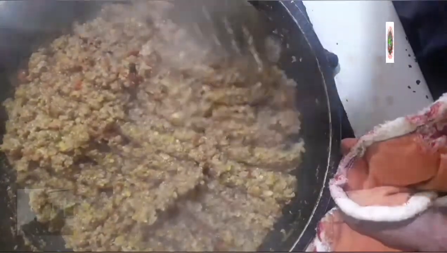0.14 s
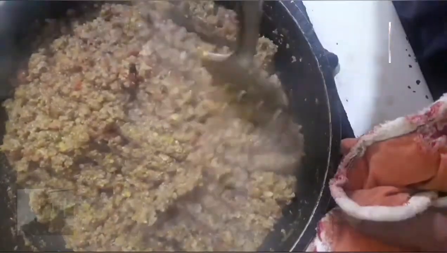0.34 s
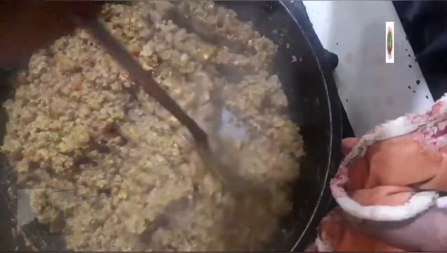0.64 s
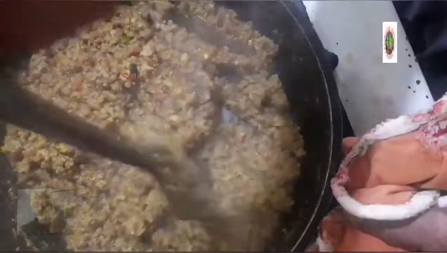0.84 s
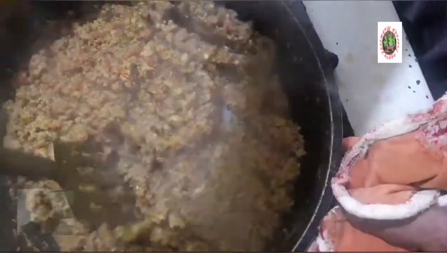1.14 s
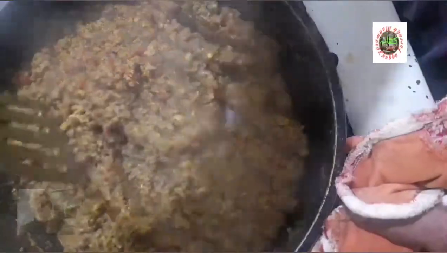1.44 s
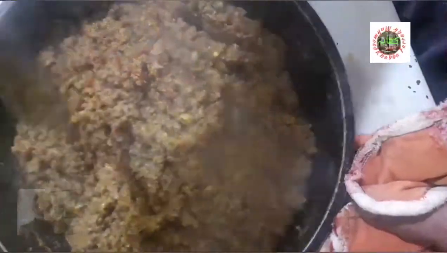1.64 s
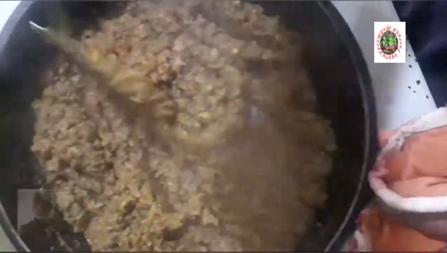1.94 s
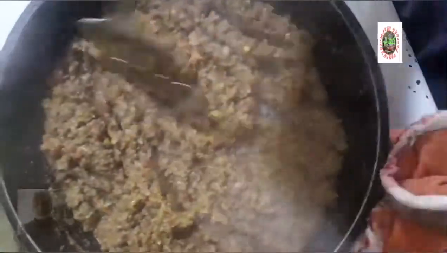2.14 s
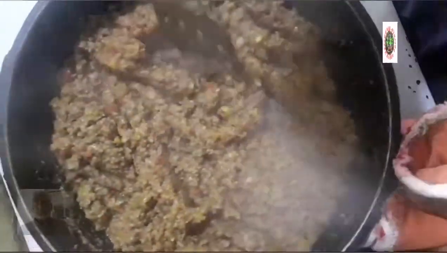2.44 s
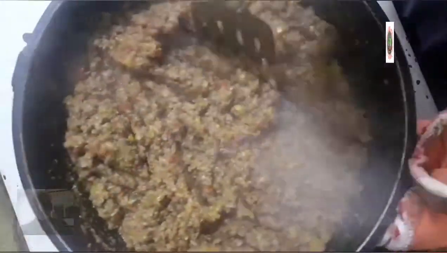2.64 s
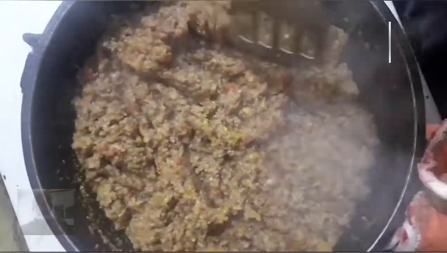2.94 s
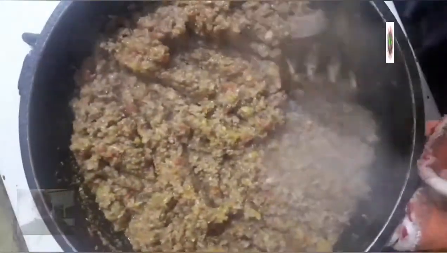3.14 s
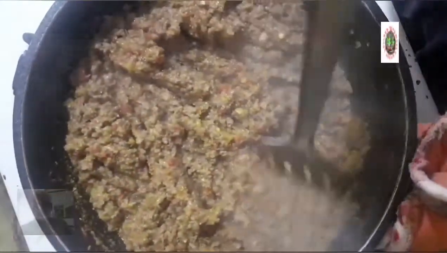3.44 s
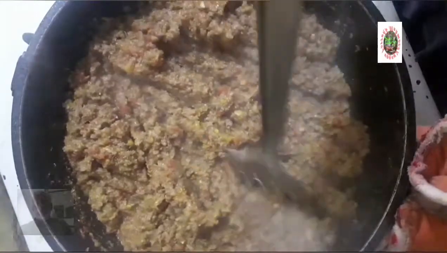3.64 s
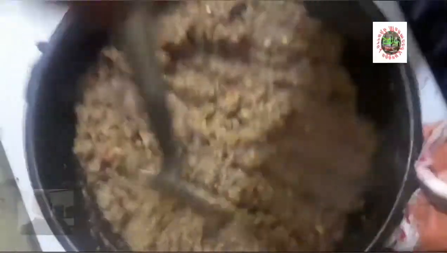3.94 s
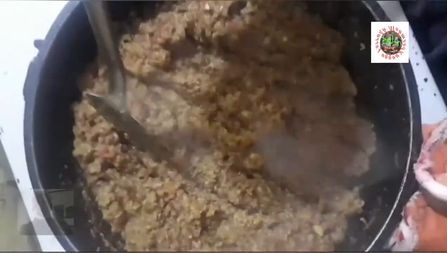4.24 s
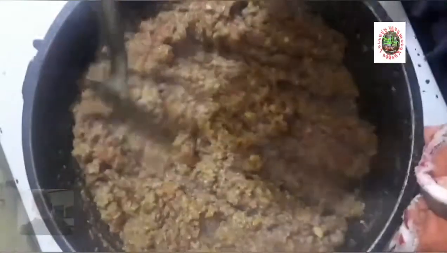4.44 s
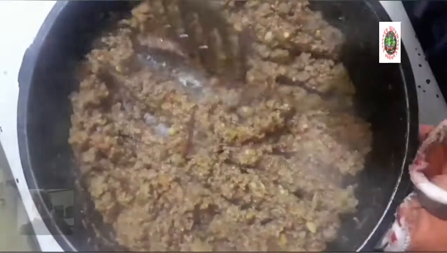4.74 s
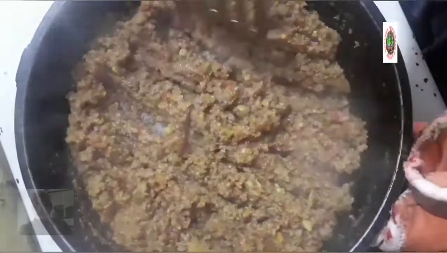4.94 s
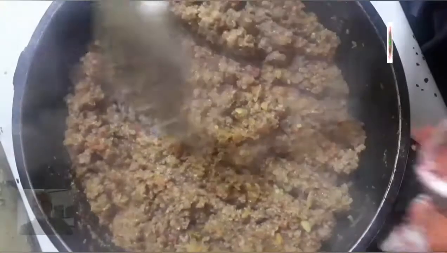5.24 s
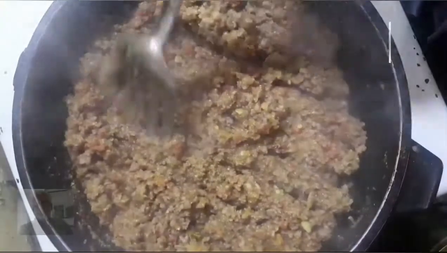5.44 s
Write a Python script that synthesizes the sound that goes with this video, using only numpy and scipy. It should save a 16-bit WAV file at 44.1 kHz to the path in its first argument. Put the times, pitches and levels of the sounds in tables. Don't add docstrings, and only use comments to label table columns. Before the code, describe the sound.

Steady frying hiss and a low flame rumble run beneath quick, uneven metal chops against a pan. Hard clacks dominate the first two seconds, duller cushioned touches break in between later groups of loud blows, and the strongest, thudding hit comes shortly before the end. Thin blade rings, small scrapes and wet meat pats fill the gaps. Close single microphone, hard small kitchen, brief reflections.

```python
import sys
import numpy as np
from scipy import signal
from scipy.fft import rfft, irfft, next_fast_len
from scipy.io import wavfile
from scipy.ndimage import uniform_filter1d, minimum_filter1d

SR = 44100
rng = np.random.default_rng(int(sys.argv[2]) if len(sys.argv) > 2 else 0)


def transcribe(signal):
    frames = np.atleast_2d(signal).T
    limited = np.clip(frames, -1, 1)
    pcm = np.round(limited * 32767).astype(np.int16)
    wavfile.write(sys.argv[1], SR, pcm)


def how_loud(loudness_db):
    steps = np.asarray(loudness_db, float) / 20
    return 10 ** steps


N = 247401


def rms_one(x):
    return x / np.sqrt(np.mean(x ** 2) + 1e-20)


def at_hz(points, hz):
    table_hz, values = np.array(points)[:, 0], np.array(points)[:, 1]
    return np.interp(np.log(np.maximum(hz, 1)), np.log(table_hz), values)


def colour(x, spectrum):
    size = next_fast_len(len(x))
    hz = np.arange(size // 2 + 1) * SR / size
    return irfft(rfft(x, size) * how_loud(at_hz(spectrum, hz)), size)[:len(x)]


def band(x, low_hz, high_hz):
    return signal.sosfilt(signal.butter(2, [low_hz, high_hz], "band", fs=SR, output="sos"), x)


def drift(rate_hz):
    r = np.exp(-80 * np.pi * rate_hz / SR)
    slow = signal.lfilter([1], [1, -2 * r, r * r], rng.standard_normal(N // 40 + 2002))[2000:]
    return np.interp(np.arange(N) / 40, np.arange(len(slow)), rms_one(slow))


def ring(push, hz, t60):
    r, w = how_loud(-60 / (t60 * SR)), 2 * np.pi * hz / SR
    return signal.lfilter([0, np.sin(w)], [1, -2 * r * np.cos(w), r * r], push + 1e-18)


def lift(hz, mode_hz, width_hz):
    return 1 / (1 + (2 * (hz - mode_hz) / width_hz) ** 2)


def struck(db_by_bin):
    size = 2 * (len(db_by_bin) - 1)
    cepstrum = irfft(db_by_bin * np.log(10) / 20, size)
    cepstrum[1:size // 2] *= 2
    cepstrum[size // 2 + 1:] = 0
    return irfft(np.exp(rfft(cepstrum)), size)


def scatter(x, spread_s, count=3):
    for lag in (rng.uniform(.2, 1, count) * spread_s * SR).astype(int) + 2:
        poles = np.zeros(lag + 1)
        poles[[0, -1]] = 1, -0.72
        x = signal.lfilter(poles[::-1], poles, x)
    return x


def add(track, s, sound):
    i = max(round(s * SR), 0)
    track[i:i + len(sound)] += sound[:N - i]


# time in seconds, level in dB.
FRY_VIGOUR = [
    (0.0, -51),
    (0.7, -51),
    (1.48, -51),
    (1.83, -52),
    (2.25, -51),
    (3.2, -53),
    (4.2, -53),
    (4.7, -52),
    (5.3, -53),
    (5.61, -53),
]
# frequency in Hz, density in dB per Hz.
SIZZLE_COLOUR = [(760, -39), (1300, -31), (1670, 1.5), (2900, -3.5), (3840, 0.5), (5650, -1), (7040, -1),
                 (7490, -2.5), (9130, -14.5), (10800, -8), (15700, -8.5)]
# frequency in Hz, density in dB per Hz.
BURNER_COLOUR = [(18, -71), (30, -21), (75, -14.5), (87, -8), (188, -13), (240, -3.5), (269, -10),
                 (386, -4), (432, -10), (673, -15.5), (1500, -19), (1950, -47), (3300, -120)]


def frying(pops_per_s=9200.0, uneven_db=2.5, flicker_db=.4):
    s, sizzle_db = np.transpose(FRY_VIGOUR)
    burner_db = -49 + 1.74 * (sizzle_db - sizzle_db.mean())
    t = np.arange(N) / SR
    pops = how_loud(uneven_db * np.minimum(rng.exponential(1, N), 5)) * rng.choice([-1, 1], N)
    pops *= rng.random(N) < pops_per_s / SR
    sizzle = rms_one(colour(pops, SIZZLE_COLOUR))
    sizzle *= how_loud(np.interp(t, s, sizzle_db) + 2.0 + flicker_db * drift(9.1))
    burner = rms_one(colour(rng.standard_normal(N), BURNER_COLOUR))
    burner *= how_loud(np.interp(t, s, burner_db) + 1.5 * drift(8))
    return sizzle + burner


# frequency in Hz, time to fall 60 dB in seconds.
ROOM_T60 = [(200, 0.29), (530, 0.31), (1390, 0.32), (3680, 0.28), (9700, 0.22)]
# frequency in Hz, level in dB.
ROOM_COLOUR = [(100, 9), (350, 13.5), (1000, 2.5), (2000, 3), (3500, 1), (7500, 3), (9000, 2.5),
               (15000, 2.5)]


def kitchen(x, gap_s=0.0018, swell_s=0.0036, moves_per_s=1.699, count=3):
    wall_s, wall_spread_s, wall_db = 0.017, 0.0048, 2.5
    t = np.arange(round(.6 * SR)) / SR
    edges, out = 90 * 2 ** np.arange(0, 7.9, .5), 0
    for k in range(count):
        reply = 0
        for low, high in zip(edges, edges[1:]):
            hz = np.sqrt(low * high)
            decay_db = at_hz(ROOM_COLOUR, hz) - 60 * t / (1.07 * at_hz(ROOM_T60, hz))
            reply = reply + band(rng.standard_normal(len(t)), low, high) * how_loud(decay_db)
        reply *= np.clip((t - gap_s) / swell_s, 0, 1)
        reply *= how_loud(wall_db * np.exp(-((t - wall_s) / wall_spread_s) ** 2))
        share = np.sqrt(2 / count) * np.cos(np.pi * (moves_per_s * np.arange(N) / SR + k / count))
        out = out + signal.fftconvolve(x * share, reply / np.sqrt(np.sum(reply ** 2)))[:N]
    return out


# start in seconds, length in seconds, centre in Hz, level in dB.
MEAT_SLAPS = [
    (1.175, 0.015, 630, -36),
    (1.365, 0.01, 574, -35),
    (1.529, 0.023, 400, -28),
    (2.03, 0.0095, 400, -49),
    (3.98, 0.048, 372, -47),
    (4.631, 0.039, 474, -52),
    (5.026, 0.051, 322, -51),
]


def slaps(lumps_per_s=400.0):
    out, t = np.zeros(N), np.arange(8000) / SR
    for s, length, hz, db in MEAT_SLAPS:
        lumps = rng.standard_normal(len(t)) * (rng.random(len(t)) < lumps_per_s / SR)
        shape = np.sin(np.pi * np.clip(t / length, 0, 1))
        add(out, s, how_loud(db) * rms_one(band(lumps, hz * 0.7, hz * 1.48)) * shape)
    return out


# start in seconds, peak in dB.
HOB_BLOWS = [
    (2.042, -13),
    (3.403, -34),
    (3.773, -25),
    (4.423, -50),
    (4.814, -12),
]


def thuds(hob_hz=110, die_s=0.0015):
    out, t = np.zeros(N), np.arange(4000) / SR
    for s, db in HOB_BLOWS:
        push = np.sin(2 * np.pi * hob_hz * t) * np.exp(-t / die_s)
        add(out, s + 0.00024, -how_loud(db + 11.5) * push)
    return out


# start in seconds, pitch in Hz, level in dB.
BLADE_SINGS = [(0.587, 5050, -53), (0.585, 1420, -37), (1.137, 1780, -44), (1.848, 4520, -37),
               (2.04, 3930, -45), (2.226, 5020, -40), (2.224, 7100, -28), (2.625, 5050, -31),
               (3.402, 3360, -22), (3.57, 3330, -32), (3.775, 3400, -31), (3.775, 960, -49),
               (3.956, 3370, -31), (4.42, 4580, -23.5), (4.816, 7800, -41), (5.405, 5040, -39),
               (5.405, 3320, -50)]
SLOT_SPLITS = [-.019, -.007, 0, .011, .023]
# start in seconds, pitch in Hz, level in dB, 60 dB decay in seconds.
CLEAN_TONES = [
    (5.405, 2805, -40, .5),
    (5.405, 4900, -44, .4),
    (5.405, 1443, -48, .4),
    (4.421, 4544, -38, .35),
    (1.668, 4522, -44, .25),
    (1.668, 7208, -44, .22),
    (1.668, 10280, -44, .19),
]


def blade(uneven_db=4.0, sing_t60_s=.3):
    out, tap = np.zeros(N), np.eye(1, 20000)[0]
    lucks = rng.normal(0, 1, (len(BLADE_SINGS), len(SLOT_SPLITS)))
    for (s, hz, db), luck in zip(BLADE_SINGS, lucks):
        for split, share in zip(SLOT_SPLITS, luck):
            tone = ring(tap, hz * (1 + 1.5 * split), sing_t60_s * (.8 - 12 * abs(split)))
            add(out, s, how_loud(db - 4 + uneven_db * share) * tone)
    for s, hz, db, t60 in CLEAN_TONES:
        add(out, s, how_loud(db) * ring(tap, hz, t60))
    return out


# start in seconds, length in seconds, pitch in Hz, level in dB.
BLADE_SQUEALS = [
    (0.2252, 0.017, 4560, -17),
    (1.663, 0.014, 4520, -22),
]


def squeals(t60_s=.06):
    out = np.zeros(N)
    for s, length, hz, db in BLADE_SQUEALS:
        stroke = np.sin(np.pi * np.clip(np.arange(2000) / SR / length, 0, 1))
        rub = rng.standard_normal(2000) * stroke
        add(out, s, how_loud(db) * (ring(rub, hz, t60_s) / 14.0 + 0.35 * band(rub, 730, 7700)))
    return out


# start in seconds, centre in Hz, level in dB, decay time in seconds.
BLADE_TICKS = [(.4105, 4000, -25, .004), (1.1315, 7000, -29, .004), (1.18, 620, -30, .008),
               (1.18, 5000, -34, .004), (1.372, 1400, -29, .005), (1.372, 3200, -34, .004),
               (1.664, 6300, -24, .012), (2.2225, 5000, -28, .004), (2.42, 990, -21, .004),
               (2.432, 1200, -35, .03), (3.181, 6500, -33, .005), (3.587, 5500, -21, .004),
               (4.418, 10000, -27, .004), (4.68, 940, -38, .006), (5.001, 1300, -24, .003),
               (5.012, 1400, -37, .03), (5.417, 1800, -27, .004)]


def ticks():
    out, t = np.zeros(N), np.arange(3000) / SR
    for s, hz, db, decay in BLADE_TICKS:
        scratch = rms_one(band(rng.standard_normal(len(t)), 0.72 * hz, 1.35 * hz))
        add(out, s, how_loud(db) * scratch * np.exp(-t / decay))
    return out


# start in seconds, peak in dB, strongest ring in Hz, edge bite in dB, blade flatness from 0 to 1.
HARD_CHOPS = [(0.025, -12.5, 5700, 9, 0.4), (0.247, 0.5, 3690, -1.5, .4), (0.414, -2.5, 3030, -3.5, 0.68),
              (0.5869, -3.5, 3170, 0.5, 0.62), (0.7722, -4, 2100, 2.5, 0.71), (0.9508, -4, 1860, 2, 0.48),
              (1.1353, -4.5, 1730, 1.5, 0.24), (1.3238, -1.5, 4430, 0.5, 0.08),
              (1.501, -3.5, 5370, 1, 0.08), (1.6674, -20, 4730, 17.5, 0.97), (1.847, -6, 4360, 3, 0.32),
              (2.0426, 0, 4170, 0.5, 0.77), (2.2262, -4.5, 5170, 2.5, 0.93), (2.6246, -0.5, 3550, 2, 0.3),
              (3.1881, -9.5, 2330, -0.5, 0.77), (3.37, -17, 4730, -3.5, 0.25), (3.401, -1, 4650, 0.5, 0.62),
              (3.5695, -4.5, 4960, 2.5, 0.8), (3.7759, -4.5, 3300, 1, 0.93), (3.9527, -9, 2010, 3.5, 0.64),
              (4.4206, -3.5, 1570, -0.5, 0.8), (4.8139, 2.5, 5650, 0.5, 0.63),
              (5.4047, -11.5, 3420, 4.5, 0.8)]
# start in seconds, peak in dB, strongest ring in Hz, cushion in dB, blade flatness from 0 to 1.
SOFT_CHOPS = [
    (2.4202, -23.5, 1054, 16, 1),
    (2.814, -13.5, 1040, 2.5, 0.2),
    (3.0074, -16.5, 5300, 9.5, 0.28),
    (4.2334, -32, 980, -4, 0.74),
    (4.6222, -39, 1000, 30, .9),
    (5.0013, -22, 1060, 16.5, 0.79),
]
USUAL_PEAK_DB, USUAL_FLATNESS = -8, 0.44


def landings():
    body_keeps = 0.61
    soft_edge_db, floor_share, floor_from_db = -9.5, 0.42, -3
    hard, soft = [], []
    for s, db, hz, edge, flat in HARD_CHOPS:
        hard.append((s, db, hz, flat, body_keeps * (USUAL_PEAK_DB - db), 0, edge))
    for s, db, hz, pad, flat in SOFT_CHOPS:
        soft.append((s, db, hz, flat, pad, floor_share * max(pad - floor_from_db, 0), soft_edge_db))
    return sorted(hard + soft)


# frequency in Hz, density in dB per Hz.
CLACK_COLOUR = [(88, -39.5), (150, -8.5), (916, -4), (2030, -2.5), (2780, -5), (3250, 0), (3790, -3.5),
                (5080, -3.5), (6800, -12), (7490, -5), (8260, -12), (12400, -13), (15700, -21)]
# pitch in Hz, width in Hz, lift in dB.
PAN_MODES = [(400, 27, 5.5), (982, 366, 4.5), (1454, 39, 9.5), (1860, 20, 5.5), (2098, 470, 2.5),
             (3130, 1000, 1.5), (4060, 480, 5), (4520, 53, 3.5), (5070, 150, 6), (5650, 43, 8.5),
             (6484, 400, 5.5), (7600, 170, 0), (11400, 590, 0.5)]
# pitch in Hz, width in Hz, lift in dB.
EDGE_MODES = [(6260, 220, 6), (7390, 180, 2.5), (9130, 66, 3), (10060, 250, 2.5), (11370, 100, 2),
              (12380, 160, -0.5), (13100, 280, -7)]
# pitch in Hz, width in Hz.
MAIN_MODES = [(950, 570), (2050, 1900), (3300, 280), (4900, 290)]
FLAT_WAKES = [19, -1, 8.5, 1]


def chops(spread_db=1.5, best_db=7.5, trim_db=13.5, rim=0.52):
    out, close, hz = np.zeros(N), np.zeros(N), np.arange(2049) * SR / 4096
    lead_s, lead_db, smear_s = .0035, -26, .0005
    modes = PAN_MODES + EDGE_MODES
    for s, peak_db, best_hz, flat, body_db, floor_db, edge_db in landings():
        aim = how_loud(0.04 + np.clip(0.13 * (USUAL_PEAK_DB - peak_db), -4, 5))
        place = [(500, body_db), (900, floor_db), (1700, floor_db), (2800, 0), (6000, 0), (8500, edge_db)]
        db = at_hz(CLACK_COLOUR, hz) + at_hz(place, hz) + best_db * lift(hz, best_hz, 0.097 * best_hz)
        db -= 4.4 * lift(hz, 725, 85)
        jolt_db = sum(max(d + 34, 0) for at, d in HOB_BLOWS if abs(at - s) < .01)
        db -= 0.38 * jolt_db * lift(hz, 1860, 3400)
        for mode, wake_db in zip(MAIN_MODES, FLAT_WAKES):
            db += (flat - USUAL_FLATNESS) * wake_db * lift(hz, *mode)
        for (mode_hz, width, lift_db), luck in zip(modes, rng.normal(0, 1, len(modes))):
            chance_db = spread_db * (1 + mode_hz / 5000) * np.clip(luck, -2, 1.2)
            db += (lift_db + chance_db) * lift(hz, mode_hz, width)
        sound = scatter(struck(db), smear_s)
        sound *= how_loud(peak_db + trim_db) / np.sqrt(np.sum(band(sound, 2500, 7000) ** 2))
        add(out, s, sound)
        add(close, s, (aim - 1) * sound)
        add(close, s + rng.uniform(.0008, 0.0022), -rim * aim * sound)
        t = np.arange(600) / SR
        graze = band(rng.standard_normal(600), 6000, 6200) * np.clip(t / lead_s, 0, 1) * (t < lead_s + .001)
        add(out, s - lead_s, how_loud(peak_db + lead_db) * graze)
    return out, close


def scene():
    clack, close = chops()
    pan, thud = clack + squeals() + slaps(), thuds()
    room = how_loud(-4.0) * kitchen(pan + 0.062 * thud)
    mono = pan + close + thud + blade() + room + frying() + ticks()
    return np.stack([mono, mono])


def noise_fill(x, from_hz=4500, width_hz=950, jump_db=7.5):
    hz, frames, cells = signal.stft(x, SR, nperseg=1024)
    level = 10 * np.log10(np.sum(np.abs(cells[0]) ** 2, axis=0) + 1e-12)
    calm = (np.diff(level, prepend=0) < jump_db).astype(float)
    steady = minimum_filter1d(calm, size=3, origin=-1) > 0
    luck = np.repeat(rng.random((30, len(frames) // 4 + 1)), 4, axis=1)[:, :len(frames)]
    chance = np.where(level < -55, .6, np.interp(hz, [10000, 13500], [.08, .7])[:, None])
    chance = chance * np.where(hz < 8000, .5, 1)[:, None]
    swap = (luck[(hz // width_hz).astype(int)] < chance) & steady & (hz[:, None] > from_hz)
    smooth = np.sqrt(uniform_filter1d(np.abs(cells) ** 2, size=21, axis=1))
    fresh = signal.stft(rng.standard_normal(x.shape), SR, nperseg=1024)[2]
    cells = np.where(swap, smooth * fresh / np.sqrt(np.mean(np.abs(fresh) ** 2)), cells)
    return signal.istft(cells, SR, nperseg=1024)[1][:, :N]


def low_pass(x):
    return signal.sosfilt(signal.butter(12, 16830, fs=SR, output="sos"), x)


def record(dry):
    limited = 1.1 * np.tanh(dry / 1.1)
    x = signal.sosfilt(signal.butter(3, 52, "high", fs=SR, output="sos"), limited)
    x = signal.sosfilt(signal.ellip(10, .5, 60, 15750, fs=SR, output="sos"), noise_fill(x))
    return low_pass(x)


dry = scene()
out = record(dry)
transcribe(out)
```